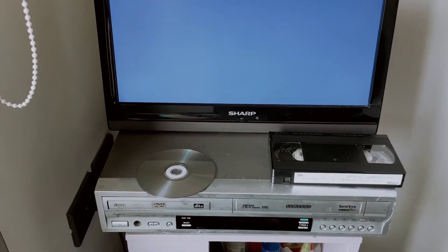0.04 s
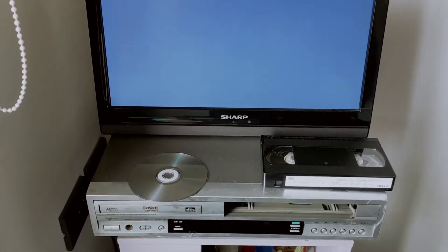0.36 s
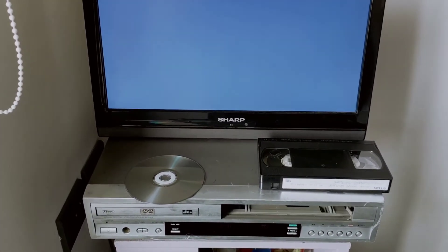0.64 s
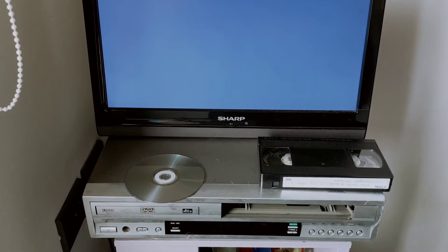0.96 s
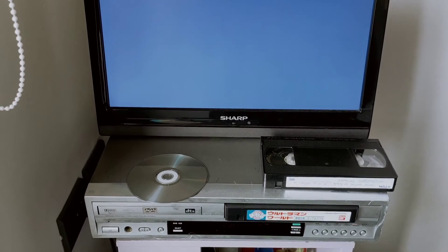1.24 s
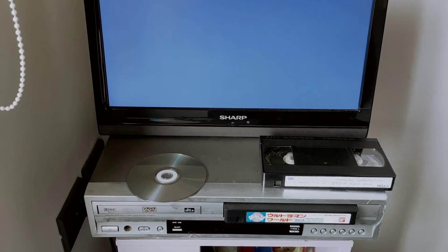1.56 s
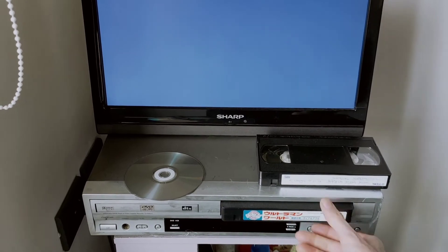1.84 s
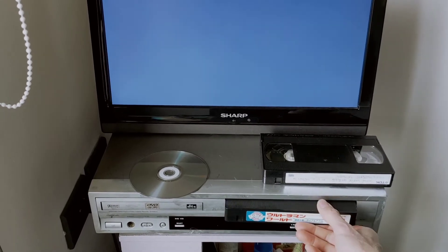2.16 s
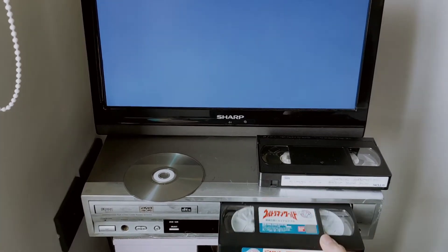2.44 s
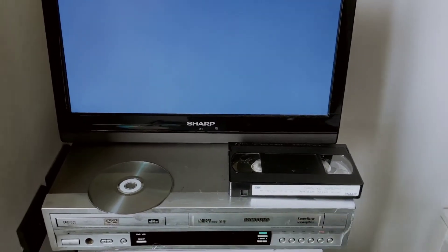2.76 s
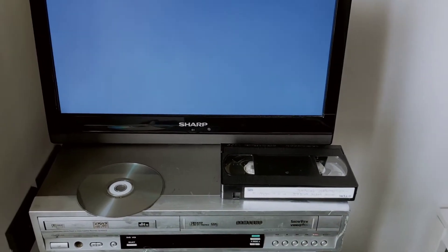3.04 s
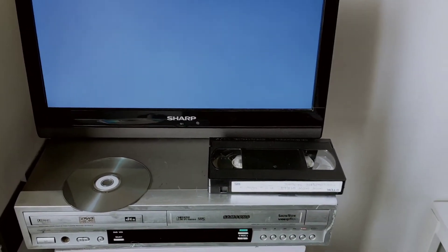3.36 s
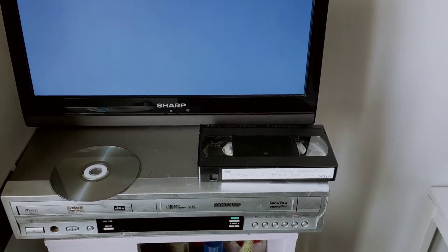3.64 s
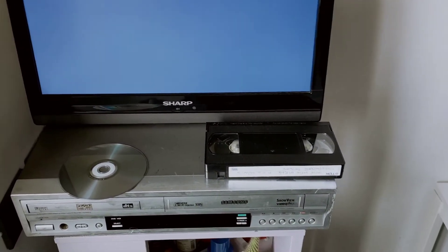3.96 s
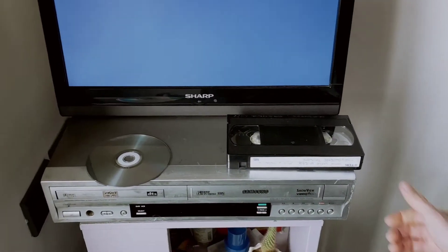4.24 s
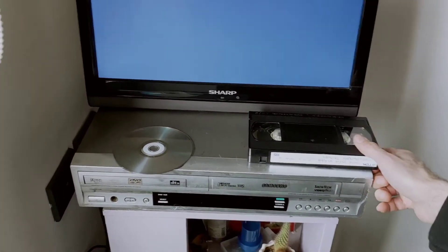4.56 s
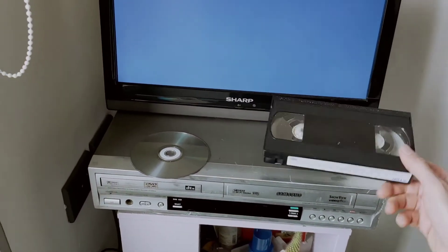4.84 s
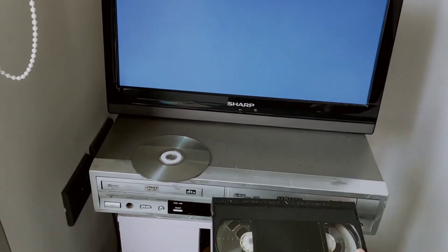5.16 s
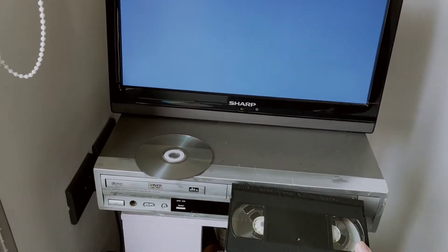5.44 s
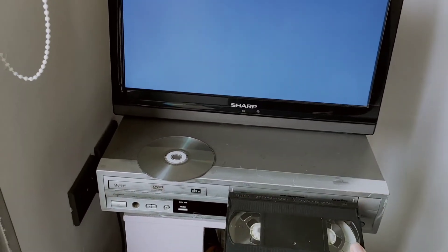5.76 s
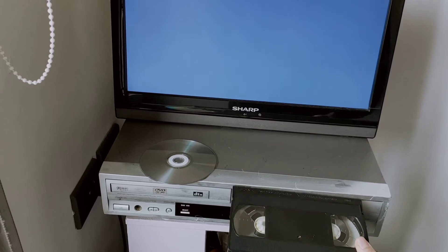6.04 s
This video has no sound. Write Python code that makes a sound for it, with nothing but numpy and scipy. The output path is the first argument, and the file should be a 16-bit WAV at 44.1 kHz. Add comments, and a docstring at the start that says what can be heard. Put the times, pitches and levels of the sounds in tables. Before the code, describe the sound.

A tape machine's motor hums and grinds close by while latches snap and the tray grates, pushing out a video cassette. The motor dies away, and the hollow plastic shell rattles and scrapes out of the opening. It thuds onto a shelf, another tape is lifted with soft scuffs, and it bumps and rubs against the slot in two clusters of knocks. The room is small, with a faint background hum.

```python
"""A videotape machine in the corner of a small room whirs, unlatches and pushes out its cassette.
A hand drags the tape out, sets it down on a shelf with a thud, picks up a second tape and
knocks it into the slot. The motor and spinning head drum make wavering tones. Each knock is a
quick rattle, each scrape a stream of tiny slips, and both make plastic or sheet metal ring."""
import sys
import numpy as np
from scipy import signal
from scipy.fft import rfft, irfft
from scipy.io import wavfile
from scipy.ndimage import uniform_filter1d

SR = 44100
rng = np.random.default_rng(int(sys.argv[2]) if len(sys.argv) > 2 else 0)


def pcm_store(signal):
    """Save signal as 16-bit PCM."""
    levels = np.round(np.clip(np.atleast_2d(signal), -1, 1) * 32767)
    wavfile.write(sys.argv[1], SR, levels.astype(np.int16).T)


N = 277389
TIME = np.arange(N) / SR


def undb(db):
    """Turn decibels into a number to multiply by."""
    return 10 ** (np.asarray(db) / 20)


def unit(x):
    """Scale a sound to an average strength (rms) of 1."""
    return x / np.sqrt(np.mean(x ** 2))


def value_at(hz, points):
    """Read between (pitch_hz, value) points."""
    pitches, values = np.transpose(points)
    return np.interp(np.log(np.maximum(hz, 1)), np.log(pitches), values)


def band(x, kind, hz, order=3):
    """Keep the lows, the highs or a band between."""
    return signal.sosfilt(signal.butter(order, hz, kind, fs=SR, output="sos"), x)


def colour(x, points, size=4096):
    """Shape the tone to follow (pitch_hz, level_db) points."""
    cepstrum = irfft(np.log(undb(value_at(np.fft.rfftfreq(size, 1 / SR), points))))
    cepstrum[1:size // 2] *= 2  # folded so that nothing rings before it is struck
    cepstrum[size // 2 + 1:] = 0
    return signal.fftconvolve(x, irfft(np.exp(rfft(cepstrum))))[:len(x)]


def resonate(x, hz, width_hz):
    """Ring at one pitch; a narrower width rings longer."""
    return signal.lfilter(*signal.iirpeak(hz, hz / width_hz, fs=SR), x)


def narrow_noise(hz, width_hz):
    """Noise filtered twice around one pitch."""
    return resonate(resonate(rng.standard_normal(N), hz, width_hz), hz, width_hz)


def body(force, tone, notes, ring_db):
    """A shaken object has a broad tone, and a few notes that ring on clearly."""
    ring = sum(undb(db) * resonate(force, hz, width) for hz, width, db in notes)
    return unit(colour(force, tone)) + undb(ring_db) * unit(ring)


def wander(rate_hz):
    """A random drift of about 1 either way."""
    points = rng.standard_normal(N // 100)
    return np.interp(TIME * rate_hz, np.arange(len(points)), points)


def gain_curve(times_s, db, fade_s=.013):
    """Loudness along a line of points, silent outside it."""
    edges_s = np.r_[times_s[0] - fade_s, times_s, times_s[-1] + fade_s]
    return undb(np.interp(TIME, edges_s, np.r_[-120, db, -120]))


def turning(hz, wobble):
    """The angle of a wheel that runs slightly unevenly."""
    return 2 * np.pi * np.cumsum(hz * (1 + wobble * wander(69.1))) / SR


def running(db, fade_db_per_s, off_s, coast_s):
    """A drive eases off while it runs and dies away once switched off."""
    return undb(db - fade_db_per_s * TIME - 60 * np.maximum(TIME - off_s, 0) / coast_s)


def slips(per_second, spread_db):
    """Tiny random jerks, as when sliding surfaces stick and let go."""
    size = undb(spread_db * np.minimum(rng.exponential(size=N), 3))
    return (rng.random(N) < per_second / SR) * size * rng.choice([-1, 1], N)


def blows(table, tone, notes, ring_db, bands_db, scatter_db, rattle_s, rise_s):
    """Each blow is a dying rattle; softer ones are slower and duller, heavier ones deeper."""
    low_db, middle_db, high_db = bands_db
    t = TIME[:SR // 3]
    push = 1. * (t == 0)
    out = np.zeros(N + len(t))
    for start_s, level_db, bass_db, treble_db in table:
        slowness = 2 ** (-treble_db / 45)  # 45 dB less treble lasts twice as long
        swell = 1 - np.exp(-t / (rise_s * slowness))
        rattle = rng.standard_normal(len(t)) * undb(-60 * t / (rattle_s * slowness)) * swell
        # where the blow lands sets each note's share; the grip shifts its pitch a little
        shares = rng.choice([-1, 1], len(notes)) * undb(scatter_db * rng.standard_normal(len(notes)))
        shifts = 1 + .0058 * rng.standard_normal(len(notes))
        ring = sum(share * undb(db) * resonate(push, hz * shift, width)
                   for (hz, width, db), share, shift in zip(notes, shares, shifts))
        sound = unit(colour(rattle, tone)) + undb(ring_db) * unit(ring * swell)
        low = undb(low_db + bass_db) * unit(band(sound, "low", 600))
        middle = undb(middle_db) * unit(band(sound, "band", [600, 3000]))
        high = undb(high_db + treble_db) * unit(band(sound, "high", 3000))
        start = int(start_s * SR)
        out[start:start + len(t)] += undb(level_db) * (low + middle + high)
    return out[:N]


def rub(curve, sound):
    """A sound's dull and bright parts each follow a loudness curve, with a random flutter."""
    times_s, level_db, treble_db = np.transpose(curve)
    uneven = sound * undb(1.5 * wander(45))
    dull = unit(band(uneven, "low", 3000)) * gain_curve(times_s, level_db)
    bright = unit(band(uneven, "high", 3000)) * gain_curve(times_s, treble_db)
    return dull + bright


def stroke(start_s, end_s, attack_s, level_db, swell_db, treble_db, release_s, dulling_db):
    """Fade in, swell or ease, fade out: the curve that rub() follows."""
    times_s = [start_s - attack_s, start_s, end_s, end_s + release_s]
    levels = level_db + np.array([-30, 0, swell_db, swell_db - 30])
    trebles = levels + treble_db - dulling_db * np.array([0, 0, 1, 1])
    return np.c_[times_s, levels, trebles]


# how much left and right differ: pitch_hz, level_db
STEREO_WIDTH = [(60, -22.5), (250, -12), (420, -17), (600, -2), (1000, -7.5), (2000, -4.5), (5000, -1.5),
                (14000, -1)]
def stereo(mid, side):
    """Sound from all around: alike in both ears in the bass, different in the treble."""
    return mid + np.array([[1], [-1]]) * colour(side, STEREO_WIDTH)


# tone of the still room: pitch_hz, level_db
AIR_TONE = [(15, -39.5), (25, -12), (79, -14.5), (169, -20), (233, -6), (297, -18), (598, -17.5),
            (741, -28.5), (871, -10.5), (1050, -20), (1620, -29), (1900, -31.5), (3630, -33.5), (8130, -44),
            (15500, -41)]
# hums of idling equipment: pitch_hz, width_hz, level_db
IDLE_HUMS = [(62.3, 9.4, -73), (241, 21, -90), (858, 160, -81.5)]
def air():
    """Quiet room noise with the hum of idling equipment."""
    mid, side = (unit(colour(rng.standard_normal(N), AIR_TONE)) for _ in range(2))
    hum = sum(undb(db) * unit(narrow_noise(hz, 2 * width)) for hz, width, db in IDLE_HUMS)
    return undb(-66) * stereo(mid, side) + hum


# tone of the gearbox: pitch_hz, level_db
GEARBOX_TONE = [(120, -26), (190, -22), (250, -1.5), (380, 3.5), (500, -9), (700, -11.5), (950, -4.5),
                (1500, -13), (2200, -20), (3000, -42), (8500, -34), (15500, -84)]
# notes it rings at: pitch_hz, width_hz, level_db
GEARBOX_NOTES = [(260, 9.4, 1), (290, 30, 5), (380, 120, -3.5), (940, 27, -23), (1040, 47, 12),
                 (1500, 38, 0.5)]
def motor(free_hz=423, loaded_hz=370, load_s=.15, sag_s=.12):
    """Gear teeth meet with a whir that sinks under load; each tooth rasps in the gearbox."""
    hz = loaded_hz + (free_hz - loaded_hz) * np.exp(-np.maximum(TIME - load_s, 0) / sag_s)
    phase = turning(hz, wobble=.012)
    whir = unit(np.sin(phase) + .15 * np.sin(3 * phase)) * undb(2 * wander(40.5))
    rasp = rng.standard_normal(N) * (1 + .5 * np.cos(phase))
    grind = unit(body(rasp, GEARBOX_TONE, GEARBOX_NOTES, ring_db=-10.5))
    gain = running(-54, fade_db_per_s=1.8, off_s=1.75, coast_s=1.6)
    return (undb(-9) * whir + undb(-2.5) * grind) * gain


def head_drum(start_hz=1200, end_hz=860, brake_s=.19):
    """The spinning drum that reads the tape slows with a rough, falling whine."""
    hz = end_hz + (start_hz - end_hz) * np.exp(-TIME / brake_s)
    whine = unit(np.sin(turning(hz, wobble=.0283)) * undb(4.5 * wander(111.6)))
    return whine * running(-59, fade_db_per_s=9, off_s=.4, coast_s=.25)


def rewind():
    """Loose tape hisses back into its shell: a jerk, then a faint steady run."""
    jerk = gain_curve(times_s=[.1, .5], db=[-68, -128])
    run = gain_curve(times_s=[.1, .75], db=[-86, -86])
    return unit(narrow_noise(hz=7500, width_hz=1300)) * (jerk + run)


# tone of the machine's frame: pitch_hz, level_db
DECK_TONE = [(60, -19), (130, -10), (280, -4), (400, 2.5), (520, -3), (800, -3.5), (1400, -2.5),
             (2200, -13), (3000, -7), (3800, -13.5), (5500, -10.5), (9000, -22.5), (15000, -27.5)]
# notes it rings at: pitch_hz, width_hz, level_db
DECK_NOTES = [(215, 26, -2), (278, 22, -5), (396, 21, 7), (585, 100, -3), (1084, 100, 0), (1580, 360, -5.5),
              (3200, 130, -12), (5230, 190, -29)]
# levers and latches snapping: start_s, level_db, bass_db, treble_db
LATCH_SNAPS = [(0.102, -49, -9, -4), (0.625, -53, 2, -6), (0.709, -49, 0, -9), (0.802, -48, -6, 3),
               (0.841, -41, -2, -4), (1.002, -46, 1, -5), (1.013, -44, 1, -16), (1.056, -43.5, -5, 2),
               (1.122, -43, -11, 6), (1.247, -44, -12, -22), (1.275, -45, -7, -2), (1.319, -41.5, 2, -1),
               (1.351, -35, 0, -9), (1.364, -44, 9, -7), (1.386, -33.5, -1, -8), (1.604, -52, -1, -21),
               (1.722, -60, 4, -14)]
def latches():
    """Levers snap over and shake the machine's frame."""
    return blows(LATCH_SNAPS, DECK_TONE, DECK_NOTES, ring_db=-7, bands_db=(-16, -15.5, -18),
                 scatter_db=1.5, rattle_s=.054, rise_s=.0026)


# how loudly the cassette tray grates: time_s, level_db, treble_db
TRAY_SLIDE = [(.6, -63, -80), (.79, -59, -66), (.83, -46, -58), (.9, -53, -72), (1.03, -54, -64),
              (1.11, -57, -54), (1.24, -56, -66), (1.37, -44, -51), (1.48, -59, -88)]
def tray():
    """The tray that carries the cassette grates along its guides."""
    grate = body(slips(per_second=2200, spread_db=4.5), DECK_TONE, DECK_NOTES, ring_db=0)
    return undb(-1) * rub(TRAY_SLIDE, grate)


# springs, edges and panels set ringing by the blows: start_s, level_db, pitch_hz
PART_PINGS = [(0.708, -34, 1390), (1.015, -31, 1444), (1.356, -37, 215), (1.385, -32, 3075),
              (2.435, -30, 1008), (2.468, -24, 1985), (4.408, -39, 1730), (4.53, -33, 530),
              (4.663, -32, 1070), (5.725, -29, 1980), (5.745, -33, 195)]
def pings(trim_db=-2, rise_s=.0012):
    """A struck part rings at one pitch; higher notes die sooner."""
    t = TIME[:SR // 4]
    out = np.zeros(N)
    for start_s, level_db, pitch_hz in PART_PINGS:
        ring_s = .075 * (1000 / pitch_hz) ** .55
        gain = undb(level_db + trim_db - 60 * t / ring_s) * (1 - np.exp(-t / rise_s))
        start = int(start_s * SR)
        out[start:start + len(t)] += gain * np.sin(2 * np.pi * pitch_hz * t)
    return out


def bursts(table, length_s, octaves, trim_db=-4):
    """Very short puffs of noise, each around its own pitch."""
    t = TIME[:SR // 20]
    spread = 2 ** (octaves / 2)
    out = np.zeros(N)
    for start_s, level_db, pitch_hz in table:
        noise = band(rng.standard_normal(len(t)), "band", [pitch_hz / spread, pitch_hz * spread], 2)
        start = int(start_s * SR)
        out[start:start + len(t)] += undb(level_db + trim_db - 60 * t / length_s) * unit(noise)
    return out


# plastic catching: start_s, level_db, pitch_hz
PLASTIC_SQUEAKS = [(1.214, -44, 3480), (3.230, -44, 2520), (3.322, -47, 2300), (3.388, -45, 3100)]
def squeaks():
    """Plastic catches with a short squeak, almost a note."""
    return bursts(PLASTIC_SQUEAKS, length_s=.025, octaves=.25)


# tone of a cassette's plastic shell: pitch_hz, level_db
SHELL_TONE = [(60, -33.5), (110, -12.5), (190, -12), (370, 1), (470, -3.5), (750, -6), (1100, -2.5),
              (1900, -6.5), (2500, -14), (3200, -8), (4200, -11), (6000, -11), (9000, -21.5), (15000, -27)]
# notes it rings at: pitch_hz, width_hz, level_db
SHELL_NOTES = [(135.5, 4.7, -9.5), (195, 13.6, -3), (237, 41, 0.5), (287.5, 7.3, 4.5), (375, 62, 8.5),
               (643, 25, 3.5), (805, 42, -6), (957, 13, -8.5), (1006, 160, -4), (1300, 15, -12),
               (1650, 50, -4), (1980, 12, -23), (3045, 70, -9), (3430, 100, -21), (4540, 28, -20),
               (5240, 80, -49)]
# shell hitting the machine: start_s, level_db, bass_db, treble_db
SHELL_KNOCKS = [(1.924, -63, 8, -2), (2.241, -39.5, -17, -12), (2.262, -34, -15, -10),
                (2.302, -30.5, -20, -10), (2.321, -34.5, -9, -25), (2.468, -29, -7, -11),
                (2.545, -35, -14, -8), (4.406, -47, -6, 1), (4.528, -41.5, 0, -5), (4.647, -46, 0, -13),
                (4.662, -35, -3, -13), (4.899, -51, -8, -9), (5.527, -40, -9, -5), (5.558, -39, -8, -17),
                (5.679, -34, -10, -14), (5.706, -36.5, -9, -7), (5.723, -23.5, -18, 0),
                (5.752, -31.5, -3, -16), (6.008, -35, -6, 0), (6.038, -40, -7, 3), (6.093, -33.5, -2, -9),
                (6.114, -37, 1, -13), (6.208, -26, -5, -7), (6.222, -26.5, -5, -18)]
def knocks():
    """A hollow cassette knocks against the machine and rings."""
    return blows(SHELL_KNOCKS, SHELL_TONE, SHELL_NOTES, ring_db=-11, bands_db=(-13.5, -15, -17),
                 scatter_db=3, rattle_s=.048, rise_s=.003)


# tiny ticks close by: start_s, level_db, pitch_hz
DRY_TICKS = [(2.04, -54, 5200), (2.071, -51, 7500), (2.094, -46, 11500), (2.103, -45, 11000),
             (2.116, -53, 13000), (2.146, -55, 9000)]
def ticks():
    """Dry, bright ticks with no clear note."""
    return bursts(DRY_TICKS, length_s=.019, octaves=1.2)


# strokes of the hand: start_s, end_s, attack_s, level_db, swell_db, treble_db
HAND_STROKES = [(2.21, 2.58, .24, -48.5, 9, -12), (4.42, 4.78, .02, -57, -1, -8),
                (4.89, 4.96, .03, -60, -1, -6), (5.54, 5.71, .02, -50.5, 5, -19),
                (6.02, 6.29, .02, -39.5, 0, -18)]
def scuffs():
    """The hand scuffs a cassette over the machine."""
    scuff = body(slips(per_second=2500, spread_db=3.5), SHELL_TONE, SHELL_NOTES, ring_db=-7.5)
    return sum(rub(stroke(*row, release_s=.05, dulling_db=1), scuff) for row in HAND_STROKES)


# tone of the cassette slot: pitch_hz, level_db
SLOT_TONE = [(70, -48), (130, 5.5), (165, -12.5), (240, 0.5), (390, 2.5), (580, 1.5), (780, -8),
             (1150, -0.5), (1600, -12.5), (2400, -30), (3200, -9.5), (3900, -27.5), (8500, -30.5),
             (14500, -25)]
# notes it rings at: pitch_hz, width_hz, level_db
SLOT_NOTES = [(128.4, 16, 4), (238, 19, -6), (285, 25, -10), (404, 17, 10), (482, 22, -27), (550, 25, -6),
              (1030, 32, 2.5), (1285, 60, -2), (1480, 70, 1)]
def drag():
    """The cassette judders over the lip of the slot."""
    judder = body(slips(per_second=1100, spread_db=3), SLOT_TONE, SLOT_NOTES, ring_db=-8)
    pull = stroke(start_s=2.615, end_s=2.77, attack_s=.16, level_db=-34, swell_db=-3,
                  treble_db=-6, release_s=.09, dulling_db=14)
    return rub(pull, judder)


# tone of the tape meeting the shelf: pitch_hz, level_db
SHELF_TONE = [(60, -21), (140, -19), (240, -15.5), (400, -3), (560, -5.5), (720, -9), (1100, -9),
              (1800, -18), (2600, -20), (4000, -19), (7500, -24.5), (9500, -36), (15500, -39)]
# notes that ring: pitch_hz, width_hz, level_db
SHELF_NOTES = [(230, 29, -9.5), (379, 32, 6.5), (468, 31, -5.5), (563, 32, 1), (970, 44, -7),
               (1143, 60, -8.5), (1690, 55, -31), (1743, 44, -13), (1905, 70, -25)]
# two bumps and a thud: start_s, level_db, bass_db, treble_db
SHELF_BUMPS = [(3.211, -46, -9, -28), (3.549, -56, -9, -9), (3.897, -28.5, -1.5, -13)]
def set_down():
    """Two soft bumps, then the tape is set down with a thud that has little deep bass."""
    thuds = blows(SHELF_BUMPS, SHELF_TONE, SHELF_NOTES, ring_db=1, bands_db=(-9, -13, -9.5),
                  scatter_db=1, rattle_s=.1, rise_s=.001)
    return band(thuds, "high", 130, order=2)


# tone of the faint hiss: pitch_hz, level_db
HISS_TONE = [(240, -47), (400, -11), (577, -11), (614, -10.5), (761, -9.5), (1320, -3), (1420, -10),
             (1710, -3.5), (2550, -12.5), (6680, -21), (9070, -31), (13700, -30.5), (15500, -37)]
def faint_hiss():
    """A faint, soft hiss close by, like a breath in, just before the thud."""
    hiss = colour(slips(per_second=9000, spread_db=3), HISS_TONE)
    curve = stroke(start_s=3.59, end_s=3.89, attack_s=.09, level_db=-56.5, swell_db=-6,
                   treble_db=-1, release_s=.03, dulling_db=-1)
    return rub(curve, hiss)


# how long the room's echo takes to fade by 60 dB: pitch_hz, fade_s
ECHO_FADE = [(100, .45), (300, .38), (1000, .34), (4500, .38), (13000, .35)]
def room(x, near_db=-3, near_s=.069, tail_db=-1, build_s=.01):
    """The sound itself, quick echoes from the corner, then the fading tail of a small room."""
    t = TIME[:SR * 2 // 3]
    hz = np.fft.rfftfreq(len(t), 1 / SR)
    octave = np.round(np.log2(np.maximum(hz, 64)))

    def echoes():
        noise = rfft(rng.standard_normal(len(t)))
        tail = sum(irfft(noise * (octave == k), len(t)) * undb(-60 * t / value_at(2 ** k, ECHO_FADE))
                   for k in np.unique(octave))
        tail *= 1 - np.exp(-t / build_s)
        near = rng.standard_normal(len(t)) * undb(-60 * t / near_s) * (t > .001)
        return (undb(tail_db) * unit(tail) + undb(near_db) * unit(near)) / np.sqrt(2 * len(t))

    def even(response):  # the walls favour no broad range of pitch
        power = uniform_filter1d(np.abs(rfft(response)) ** 2, 40)
        return colour(response, np.c_[hz, -10 * np.log10(power)][1:])

    response = stereo(even(echoes() + (t == 0)), even(echoes()))
    return signal.fftconvolve(x[None], response, axes=1)[:, :N]


def scene():
    """Machine, tapes and shelf each have their own echoes; squeaks and ticks are too close for any."""
    machine = room(motor() + head_drum() + rewind() + latches() + tray() + pings())
    tapes = room(knocks() + scuffs() + drag())
    shelf = room(set_down() + faint_hiss())
    return air() + machine + tapes + shelf + squeaks() + ticks()


def record(dry, top_hz=15700):
    """Cut off the very highest treble."""
    return signal.sosfilt(signal.ellip(10, .2, 70, top_hz, fs=SR, output="sos"), dry)


dry = scene()
out = record(dry)
pcm_store(out)
```